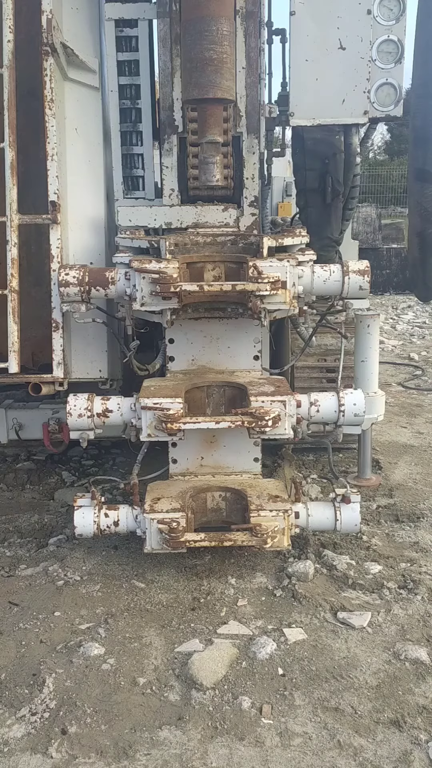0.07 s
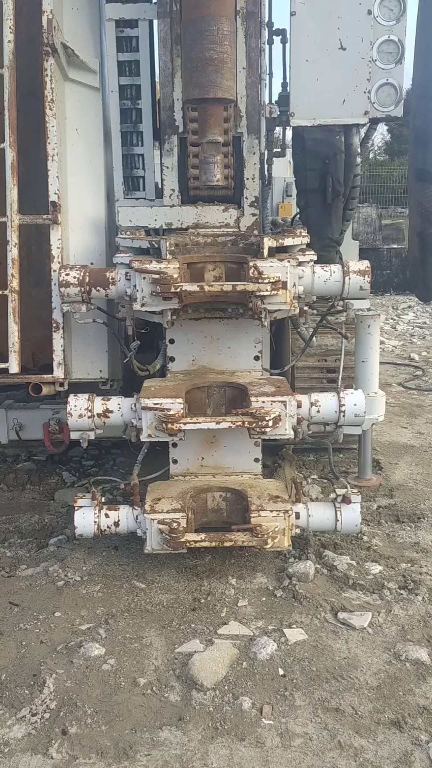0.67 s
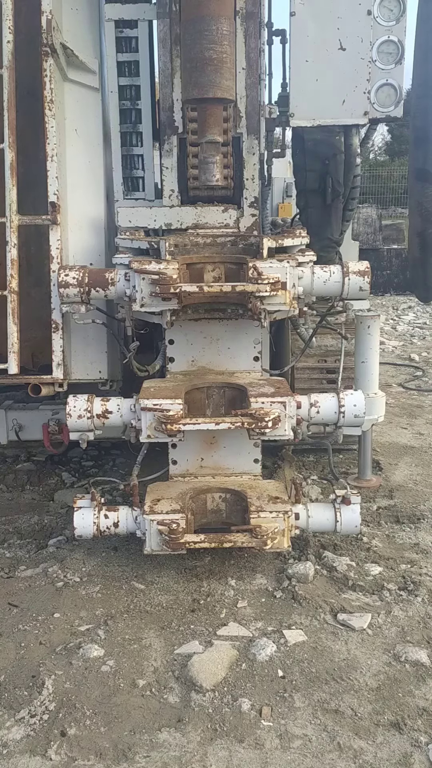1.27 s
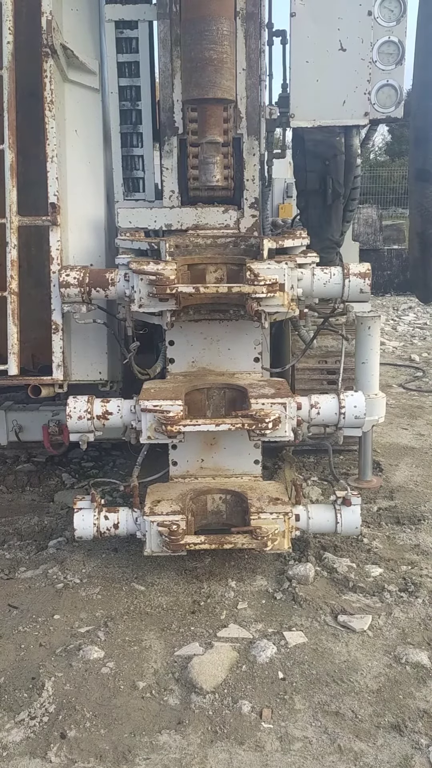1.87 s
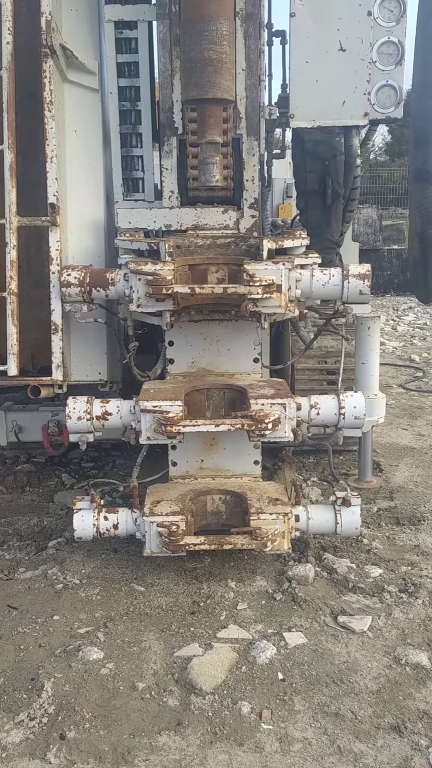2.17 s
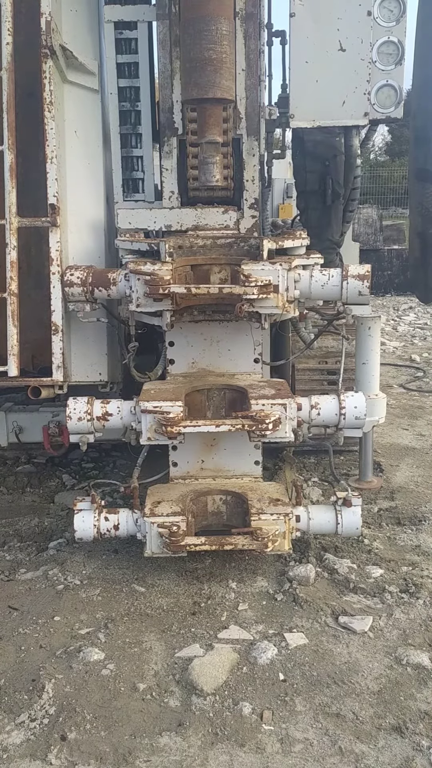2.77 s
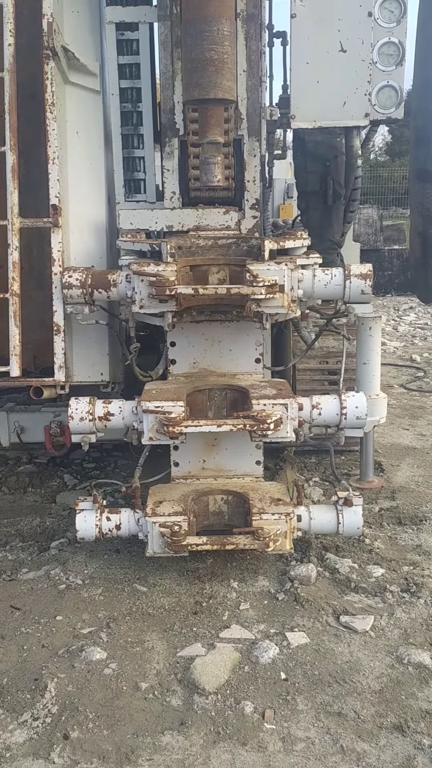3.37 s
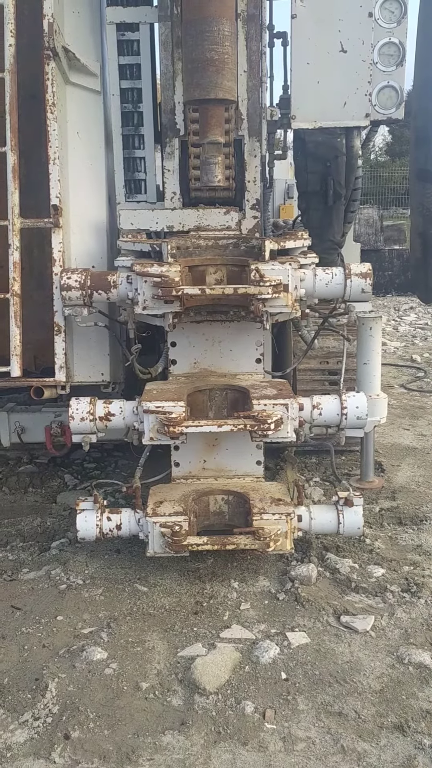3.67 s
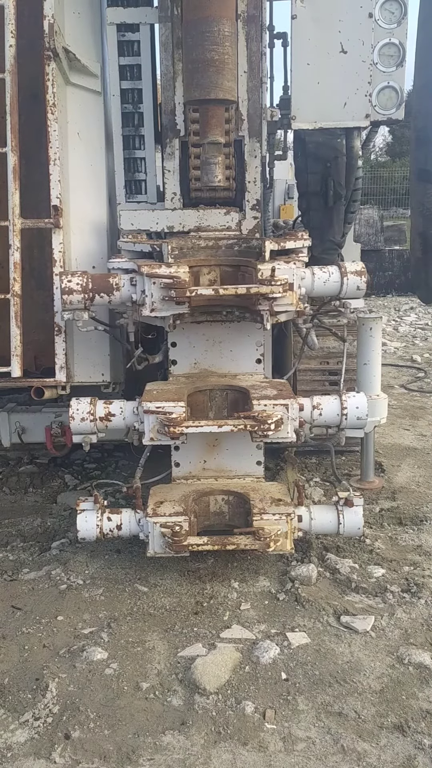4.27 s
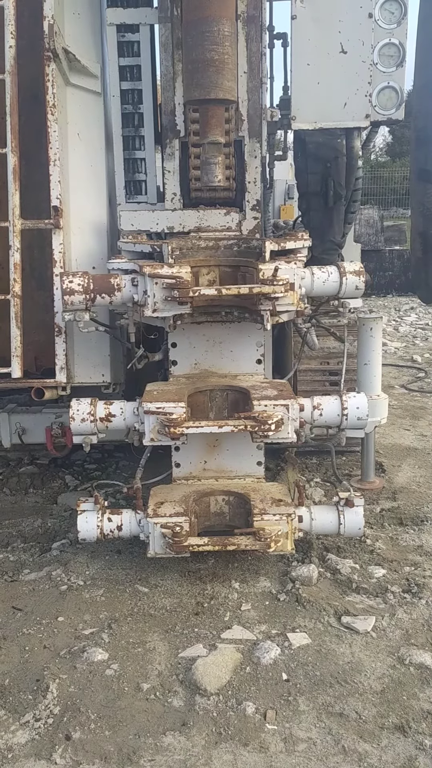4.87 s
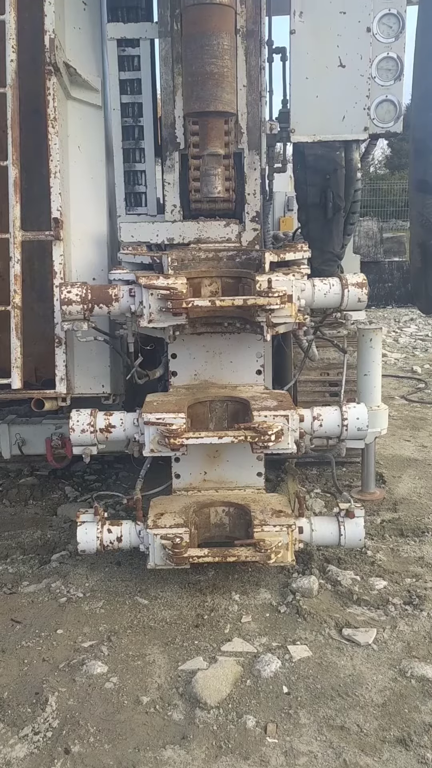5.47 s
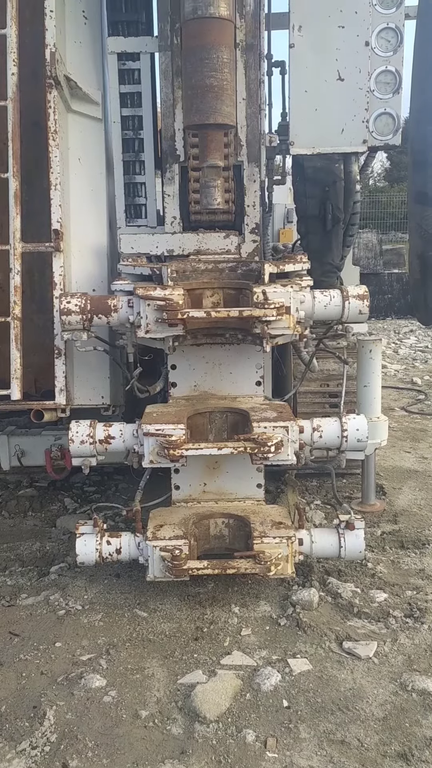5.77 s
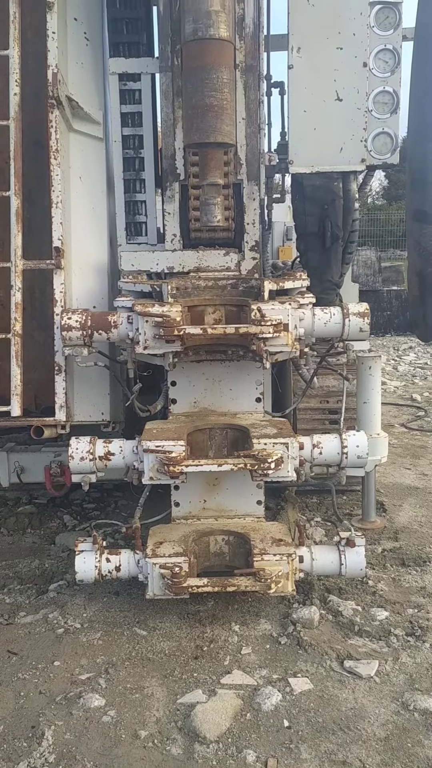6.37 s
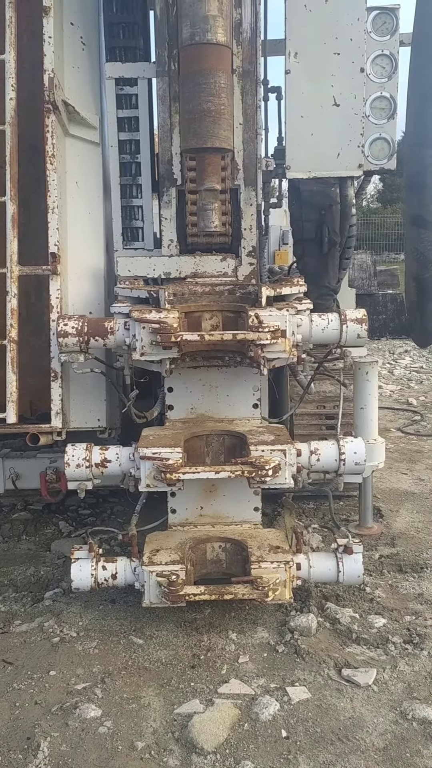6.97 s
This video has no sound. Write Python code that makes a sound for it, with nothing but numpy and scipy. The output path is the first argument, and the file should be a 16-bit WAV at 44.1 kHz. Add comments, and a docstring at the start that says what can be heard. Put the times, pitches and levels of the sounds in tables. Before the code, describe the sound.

A drilling rig's diesel engine drones steadily outdoors with hydraulic hiss, broken by four brief, rattling metal clanks.

```python
"""A drilling rig's diesel power unit runs steadily outdoors, a few metres away.
Its firings make a throbbing rumble and an exhaust drone. Its shaft drives whining gears, a nine-piston
pump and a humming, rushing fan, and sags a little whenever oil hisses through the valves.
Four times the steel rig takes up its slack: the frame thuds and loose joints chatter,
some of those times with a short scrape or the ring of a hard steel part."""
import sys
import numpy as np
from scipy import signal
from scipy.fft import rfft, irfft, next_fast_len
from scipy.io import wavfile
from scipy.ndimage import uniform_filter1d

SR = 44100
rng = np.random.default_rng(int(sys.argv[2]) if len(sys.argv) > 2 else 0)


def persist_wave(psi):
    """Save psi, clipped to +-1, as 16-bit WAV."""
    counts = np.round(np.clip(psi, -1, 1) * 32767).astype(np.int16)
    wavfile.write(sys.argv[1], SR, np.atleast_2d(counts).T)


N = 309582

FREE_HZ, DROOP_HZ = 24.68, .58  # shaft rate running free, and its sag at full load
PISTON_STROKES, BLADE_PASSES = 9, 10.05  # per shaft turn
RIG_LAG_MS, JOINT_LAG_MS = 0.17, 0.097  # left-channel delay; the joints sit nearer the centre
# stereo image of the rig: f/Hz, left minus right/dB, likeness of the channels/0-1
IMAGE = [(60, 6.5, 1), (130, 4.5, 1), (425, 8.5, 0.51), (590, -3, 0.74), (1000, 6.5, 0.9), (2400, 3.5, 0),
         (4000, 0, 0), (7500, -1, 0.15), (9200, -9.5, 0), (12100, 1, 0.2)]

# valve cues: opens/s, shuts/s, engine load/0-1, hiss level/dB
VALVE_CUES = [(0, 1.6, 0.41, -72), (1.75, 2.86, 0.97, -53), (3.26, 3.4, 0.99, -48), (3.339, 4.5, 0.99, -56),
              (5.25, 6.23, .9, -53.5), (6.55, 6.8, 0.27, -75)]
# colour of oil circulating in the pipes: f/Hz, level/dB
PIPE_COLOUR = [(1500, 7), (3000, -4), (4200, -8.5), (4950, -3.5), (5600, -11), (7200, -12), (8150, -9),
               (8450, 5), (9050, -4.5), (9500, 1.5), (10300, -14), (10900, -10), (11300, -25), (12300, -18),
               (13300, -45), (14000, -54)]
# colour of oil squeezed through a valve: f/Hz, level/dB
VALVE_COLOUR = [(2000, 4.5), (4100, -8), (5000, 3.5), (5400, -5), (7500, -3), (9000, 3.5), (9750, 9.5),
                (10600, 3.5), (11300, -20), (13100, -10), (14200, -29)]

# rising scrapes of steel on steel: t/s, length/s, first f/Hz, last f/Hz, level/dB
SCRAPE_CUES = [(3.358, 0.022, 2260, 2460, -31), (5.363, 0.017, 1600, 1700, -45),
               (5.384, 0.0075, 2130, 2300, -39)]
# modes of the loose joints: f/Hz, level/dB, t60/s
JOINT_MODES = [(410, -8, 0.051), (593, 0, 0.06), (636, 6, 0.034), (973, 12, 0.015), (1067, 0, 0.0081),
               (1134, -2.5, 0.03), (1460, 4, 0.01), (1783, -6.5, 0.025), (2130, -13.5, 0.037),
               (2630, -17, 0.016), (3530, -13.5, 0.027), (4100, -20, 0.027)]
# colour of the tiny contacts in a joint: f/Hz, level/dB
CONTACT_COLOUR = [(150, 6.5), (500, 0.5), (2000, 8), (6000, -0.5), (10000, -10), (11500, -35)]
# bursts of joint chatter: t/s, length/s, relative level/dB, brightness/dB per octave
RATTLE_CUES = [(2.632, 0.0082, -28.5, 1.5), (2.65, 0.016, -30.5, -8.5), (3.291, .004, -24, 16),
               (3.293, 0.015, -27, 4), (3.320, 0.014, -28, -2), (3.339, 0.012, -23, 10),
               (3.351, 0.0066, -19, 9), (3.355, 0.015, -24, 11), (4.562, 0.008, -26.5, 3.5),
               (4.577, 0.0051, -32, 2), (4.587, .006, -29, 8), (5.284, .002, -35, 2),
               (5.297, .011, -29, -3.5), (5.315, .013, -28.5, -3), (5.359, .022, -39.5, 2)]
# knocks of a joint on its stop: t/s, level/dB, brightness/dB per octave
KNOCK_CUES = [(2.637, -31, 4), (2.640, -33, 4), (2.822, -57, 15.5), (3.3535, -34, 10.5), (4.5665, -35, 5),
              (4.570, -35, 6), (4.580, -40, -2), (5.301, -44, -1)]
# modes of the heavy frame: f/Hz, level/dB, t60/s
FRAME_MODES = [(191, -26, 0.28), (211.5, -5.5, 0.24), (294, 3, 0.045), (315.7, 1.5, 0.049), (371, -10, 0.2),
               (536, -14, 0.058), (665, -10.5, 0.058)]
# colour of the frame's many weak, lingering modes: f/Hz, level/dB
SHUDDER_COLOUR = [(140, -32), (200, 3), (370, -4), (520, -7), (900, -24), (2000, -60)]
# blows to the frame: t/s, level/dB, brightness/dB per octave
THUD_CUES = [(2.632, -22.5, 0), (2.648, -24, 6), (2.665, -23.5, 3), (3.302, -25, 13), (3.343, -13.5, 2.5),
             (3.3512, -17.5, -11.5), (3.383, -21.5, 2), (4.55, -18.5, -4), (4.562, -21, -2),
             (4.576, -20, 2), (5.328, -24.5, 8), (5.348, -21, 2), (5.377, -19, 0)]
# pitches of the hard steel part: f/Hz
STEEL_PITCHES = [1600, 1771, 2304, 2406, 4290, 4370, 4958, 5150, 5720, 5873, 6540, 7149, 8172, 9290, 9539]
# its ring at each of those pitches: level/dB, t60/s
STEEL_RING = [(-9, .06), (-2, .1), (0, .07), (1, .08), (-8, .11), (-8, .12), (-3, .15), (-19, .16),
              (-13, .05), (-10, .045), (-22, .07), (-23, .14), (-12, .17), (-4, .09), (2.5, .175)]
# colour of the crack of steel meeting steel: f/Hz, level/dB
CRACK_COLOUR = [(900, -3), (1800, 14), (3000, -13), (5800, -9), (7500, -16), (9500, -10), (11000, -37),
                (14000, -45)]
# strikes on the steel part: t/s, level/dB, brightness/dB per octave, share of free ring time/0-1
STRIKE_CUES = [(3.3505, -27.5, 1, 1), (3.371, -33, -11, 1), (4.588, -32.5, -3.5, .55)]

# two thin machine tones, lower first: free level/dB, loaded level/dB
MACHINE_TONE_LEVELS = [(-63, -52), (-61, -52.5)]
MACHINE_TONE_MULTIPLES = [20.1, 30.15]  # f/shaft rate
# pump harmonics, lowest first: free level/dB, loaded level/dB
PUMP_LEVELS = [(-39, -42), (-47, -47.5), (-50, -55), (-59.5, -55.5), (-59, -54.5)]
# fader ride of the fan's blade hum: t/s, level/dB
HUM_RIDE = [(.5, -39), (1.65, -37.5), (2.05, -43.5), (2.4, -47.5), (2.8, -35.5), (3.2, -38), (3.7, -35.5),
            (4.15, -40), (4.45, -35), (5.1, -36.5), (5.55, -45), (6.0, -45), (6.3, -36.5), (7.0, -35)]
# fader ride of the fan's rush: t/s, low-mid level/dB, high-mid level/dB
RUSH_RIDE = [(0.5, -49, -54.5), (1.0, -50, -53.5), (1.45, -48.5, -50), (1.8, -50, -56), (2.9, -52.5, -55.5),
             (3.9, -50.5, -51), (4.65, -48, -49), (5.0, -51, -52.5), (6.7, -54, -55.5), (7.0, -49, -55)]
# colour of combustion and fan roar: f/Hz, level/dB
ROAR_COLOUR = [(15, -15), (40, -7.5), (85, -6), (114, -7.5), (126, 0.5), (155, 3), (180, -5), (230, -1),
               (285, -3.5), (320, -9.5), (400, -11), (500, -18), (620, -19), (780, -15.5), (1050, -14),
               (1400, -20), (1800, -22), (2300, -29), (4000, -41.5)]
# punch of each cylinder, in firing order: level/dB
CYLINDER_PUNCH = [-1.5, -5.5, -2, -10.5]
# fader ride of the exhaust drone: t/s, level/dB
DRONE_RIDE = [(.5, -39.5), (1.2, -39), (2.3, -41.5), (2.95, -35.5), (3.3, -47), (3.5, -39), (4.1, -40),
              (4.8, -34.5), (5.03, -48), (5.25, -39), (5.55, -41.5), (6.15, -35.5), (6.4, -36.5),
              (6.65, -48.5), (7.0, -38.5)]
# pitches of the engine and gear tones: f/shaft rate
ENGINE_MULTIPLES = [2, 3, 5, 6, 7, 8, 11, 15.5, 45.45, 48.45, 95.8]
# strength of each of those tones: free level/dB, loaded level/dB
ENGINE_LEVELS = [(-42.5, -42.5), (-54, -64), (-49.5, -51.5), (-42, -42), (-44, -44), (-51, -49),
                 (-49.5, -50), (-61, -56.5), (-69, -69), (-60.5, -77), (-65.5, -60)]


def undb(db):
    """Decibels to gain."""
    return 10 ** (np.asarray(db) / 20)


def unit(x):
    """Scale to rms 1."""
    return x / np.sqrt(np.mean(x ** 2))


def fader(rows, column=1):
    """A fader ride as a gain at every sample."""
    rows = np.array(rows)
    return undb(np.interp(np.arange(N) / SR, rows[:, 0], rows[:, column]))


def over_hz(rows, size, column=1):
    """One column of a frequency table, at every bin of a spectrum."""
    rows = np.array(rows)
    return np.interp(np.log(np.fft.rfftfreq(size, 1 / SR) + 1), np.log(rows[:, 0]), rows[:, column])


def noise(colour, size, tilt_db=0):
    """Coloured noise as a direct and a scattered part, at rms 1; the tilt is per octave."""
    octaves = np.log2(np.clip(np.fft.rfftfreq(size, 1 / SR), 300, None) / 1000)
    gain = undb(over_hz(colour, size) + tilt_db * octaves)
    return unit(irfft(rfft(rng.standard_normal((2, size))) * gain, size))


def wobble(rate_hz):
    """Smoothed random sample-and-hold, with a spread near 1."""
    hold = int(SR / rate_hz)
    steps = np.repeat(rng.standard_normal(N // hold + 1), hold)
    return np.sqrt(2) * uniform_filter1d(uniform_filter1d(steps, hold), hold)[:N]


def slew(control, seconds):
    """Smooth a control with a one-pole lag."""
    keep = np.exp(-1 / (seconds * SR))
    return signal.lfilter([1 - keep], [1, -keep], control)


def add(track, start_s, sound):
    """Drop a sound onto a track at its cue."""
    part = track[..., int(start_s * SR):int(start_s * SR) + sound.shape[-1]]
    part += sound[..., :part.shape[-1]]


def stereo(direct, scattered=None, lag_ms=RIG_LAG_MS):
    """Place a layer: it reaches the left side later, and scattered sound widens it."""
    size = next_fast_len(N + 1000)
    spectrum = lambda x: rfft(np.pad(x, (0, size - N), "reflect"))
    mid, side = spectrum(direct), 0
    if scattered is not None:
        alike = np.clip(over_hz(IMAGE, size, column=2), 0, 1)
        mid = mid * np.sqrt((1 + alike) / 2)
        side = spectrum(scattered) * np.sqrt((1 - alike) / 2)
    pan = undb(over_hz(IMAGE, size) / 2)
    delay = np.exp(-2j * np.pi * np.fft.rfftfreq(size, 1 / SR) * lag_ms / 1000)
    channels = np.array([(mid + side) * pan * delay, (mid - side) / pan])
    return irfft(channels * 2 / (pan + 1 / pan), size)[:, :N]


def decay(t, t60):
    """A tail that falls 60 dB in t60 seconds."""
    return np.exp(-np.log(1000) * t / t60)


def ring(modes, t, contact_s, bright_db=0, pivot_hz=1000):
    """Decaying modes set going over a short contact; brightness favours the high ones."""
    sound = 0
    for hz, db, t60 in modes:
        gain = undb(db + bright_db * np.log2(hz / pivot_hz))
        sound += gain * np.sin(2 * np.pi * hz * t) * decay(t, t60)
    return sound * (1 - np.exp(-t / contact_s))


def shaft_tones(partials, turns, load, waver_db, waver_hz, slip_cycles):
    """Tones that track the shaft and its load; each wavers in level and slips a little in phase."""
    sound = 0
    for multiple, (free_db, loaded_db) in partials:
        cycles = multiple * turns + rng.random() + slip_cycles * wobble(waver_hz)
        db = free_db + (loaded_db - free_db) * load + waver_db * wobble(waver_hz)
        sound += undb(db) * np.sin(2 * np.pi * cycles)
    return stereo(np.sqrt(2) * sound)


def valves(spool_s=0.019, load_lag_s=0.0666, ease_per_s=0.1195, leak_db=-62.5):
    """Engine load and hiss gain: the spool opens fast, the load follows, and shut valves still leak."""
    t = np.arange(N) / SR
    load, hiss = np.zeros((2, N))
    for opens, shuts, effort, hiss_db in VALVE_CUES:
        held = (t >= opens) & (t < shuts)
        load[held] = effort * np.exp(-ease_per_s * (t[held] - opens))  # eases once the ram moves
        hiss[held] = undb(hiss_db)
    return slew(load, load_lag_s), np.hypot(slew(hiss, spool_s), undb(leak_db))


def hydraulics(turns, hiss, pipe_db=-50.5, ripple=0.052):
    """A bed of oil hiss, rippled by the nine pistons and louder while a valve is open."""
    size = next_fast_len(N)
    flow = undb(.7 * wobble(13))
    pipes = noise(PIPE_COLOUR, size)[:, :N] * undb(pipe_db)
    valve = noise(VALVE_COLOUR, size)[:, :N] * hiss
    strokes = np.cos(2 * np.pi * PISTON_STROKES * turns)
    return stereo(*((pipes + valve) * flow * (1 + ripple * strokes)))


def scrapes(jitter=.06, rough_db=3, overtone_db=-17, edge_s=0.0042):
    """Gritty upward chirps: steel sticks and slips unevenly, faster as it is pulled tight."""
    track = np.zeros(N)
    for start, length, first_hz, last_hz, db in SCRAPE_CUES:
        t = np.arange(int(length * SR)) / SR
        hz = np.interp(t, [0, length], [first_hz, last_hz]) * (1 + jitter * wobble(2000)[:len(t)])
        phase = 2 * np.pi * np.cumsum(hz) / SR
        fade = np.clip(np.minimum(t, length - t) / edge_s, 0, 1)
        grip = undb(db + rough_db * wobble(1000)[:len(t)])
        add(track, start, fade * grip * (np.sin(phase) + undb(overtone_db) * np.sin(2 * phase)))
    return stereo(track, lag_ms=JOINT_LAG_MS)


def rattles(attack_s=0.00054, release_s=0.006, tail_db=-22, tail_s=0.15, soft_hz=3200, drive_db=-6.5):
    """Brief chatter: bursts of tiny, slightly soft contacts ring a loose joint."""
    t = np.arange(SR // 2) / SR
    soften = signal.butter(2, soft_hz, fs=SR, output="sos")
    contacts = np.zeros((2, N))
    for start, length, db, bright_db in RATTLE_CUES:
        after = np.maximum(t - length, 0)
        attack = 1 - np.exp(-t / attack_s)
        release = np.exp(-after / release_s) + undb(tail_db) * np.exp(-after / tail_s)
        grit = unit(signal.sosfilt(soften, noise(CONTACT_COLOUR, len(t), bright_db)))
        add(contacts, start, undb(db + drive_db) * attack * release * grit)
    joint = ring(JOINT_MODES, t, contact_s=.0001)
    chatter = signal.fftconvolve(contacts, joint[None] / np.linalg.norm(joint), axes=1)[:, :N]
    return stereo(*chatter, lag_ms=JOINT_LAG_MS)


def knocks():
    """Dry clacks: a loose joint hits its stop and rings briefly."""
    t = np.arange(SR // 2) / SR
    track = np.zeros(N)
    for start, db, bright_db in KNOCK_CUES:
        add(track, start, undb(db) * ring(JOINT_MODES, t, contact_s=0.0019, bright_db=bright_db))
    return stereo(track, lag_ms=JOINT_LAG_MS)


def steel_strikes(crack_db=-2, crack_t60=0.099, rough_db=-0.5):
    """Steel meets the hard steel part: a sharp crack, then a bright, rough ring."""
    t = np.arange(SR // 2) / SR
    snap = undb(crack_db) * decay(t, crack_t60)
    modes = np.column_stack([STEEL_PITCHES, STEEL_RING])
    track = np.zeros(N)
    for start, db, bright_db, ring_share in STRIKE_CUES:
        rough = undb(rough_db * wobble(450)[:len(t)])
        ringing = ring(modes * [1, 1, ring_share], t, contact_s=.0045, bright_db=bright_db)
        crack = snap * noise(CRACK_COLOUR, len(t), bright_db)[0]
        add(track, start, undb(db) * (rough * ringing + crack))
    return stereo(track)


def frame_thuds(shudder_db=-17, shudder_t60=0.64, shudder_attack_s=0.0039):
    """Blows ring the heavy frame's low modes, and its many weaker ones shudder on."""
    t = np.arange(SR // 2) / SR
    tail = undb(shudder_db) * (1 - np.exp(-t / shudder_attack_s)) * decay(t, shudder_t60)
    track = np.zeros(N)
    for start, db, bright_db in THUD_CUES:
        thud = ring(FRAME_MODES, t, contact_s=0.0032, bright_db=bright_db, pivot_hz=296)
        shudder = tail * noise(SHUDDER_COLOUR, len(t))[0]
        add(track, start, undb(db) * (thud + shudder))
    return stereo(track)


def machine_tones(turns, load):
    """Two thin machine tones near 490 and 730 Hz track the shaft and grow under load."""
    partials = zip(MACHINE_TONE_MULTIPLES, MACHINE_TONE_LEVELS)
    return shaft_tones(partials, turns, load, waver_db=-0.1, waver_hz=4.64, slip_cycles=0.0064)


def pump(turns, load):
    """Nine piston strokes a turn make a wavering buzz."""
    partials = [(PISTON_STROKES * k, levels) for k, levels in enumerate(PUMP_LEVELS, 1)]
    return shaft_tones(partials, turns, load, waver_db=1.5, waver_hz=14, slip_cycles=0.056)


def fan(turns):
    """The passing blades hum, swelling and fading."""
    return stereo(np.sqrt(2) * fader(HUM_RIDE) * np.sin(2 * np.pi * BLADE_PASSES * turns))


def roar(turns, rumble_db=-37.5, throb=1.56, sharpness=1.8, surge_db=0.72, flutter=0.04):
    """Combustion rumble throbs at each firing, twice a turn; above it the cooling fan rushes."""
    def band(edges_hz, kind):
        air = noise(ROAR_COLOUR, next_fast_len(N))[:, :N]
        return unit(signal.sosfilt(signal.butter(4, edges_hz, kind, fs=SR, output="sos"), air))
    firing = np.cos(4 * np.pi * turns)
    cylinder = np.round(2 * turns).astype(int) % len(CYLINDER_PUNCH)
    beats = 1 + throb * undb(CYLINDER_PUNCH)[cylinder] * np.exp(sharpness * (firing - 1))
    rumble = band(650, "low") * beats * undb(rumble_db + surge_db * wobble(13))
    low_mids = band([650, 1250], "band") * fader(RUSH_RIDE)
    high_mids = band([1250, 4500], "band") * fader(RUSH_RIDE, column=2)
    rush = (low_mids + high_mids) * (1 + flutter * firing) * undb(.5 * wobble(41))
    return stereo(*(rumble + rush))


def exhaust(turns):
    """A solid drone at twice the firing rate, slowly swelling and fading."""
    firings = 2 * turns
    return stereo(np.sqrt(2) * fader(DRONE_RIDE) * np.sin(2 * np.pi * 2 * firings))


def engine(turns, load):
    """The diesel's low growl and its gears' thin whine, all at multiples of the shaft rate."""
    partials = zip(ENGINE_MULTIPLES, ENGINE_LEVELS)
    return shaft_tones(partials, turns, load, waver_db=2.65, waver_hz=7, slip_cycles=.02)


def scene():
    """One shaft drives the power unit, and the governor lets it sag under load; the rig clanks on cue."""
    load, hiss = valves()
    turns = np.cumsum(FREE_HZ - DROOP_HZ * load) / SR
    tones = engine(turns, load) + exhaust(turns) + pump(turns, load) + machine_tones(turns, load)
    power_unit = tones + fan(turns) + roar(turns)
    oil = hydraulics(turns, hiss)
    clanks = frame_thuds() + steel_strikes() + knocks() + rattles() + scrapes()
    return power_unit + oil + clanks


def record(dry, start_s=.374, fade_s=0.0054, top_hz=14250):
    """A moment of silence, a snap fade-in, and a steep cut of the highest treble."""
    fade_in = np.clip((np.arange(N) / SR - start_s) / fade_s, 0, 1)
    high_cut = signal.ellip(10, .2, 80, top_hz, fs=SR, output="sos")
    return signal.sosfilt(high_cut, dry * fade_in)


dry = scene()
out = record(dry)
persist_wave(out)
```